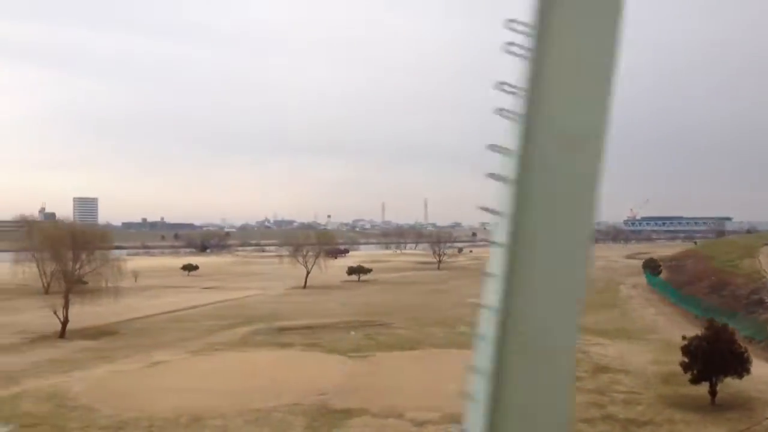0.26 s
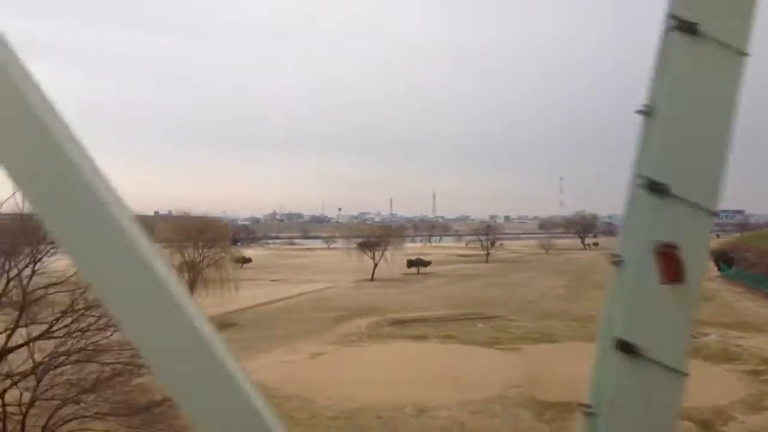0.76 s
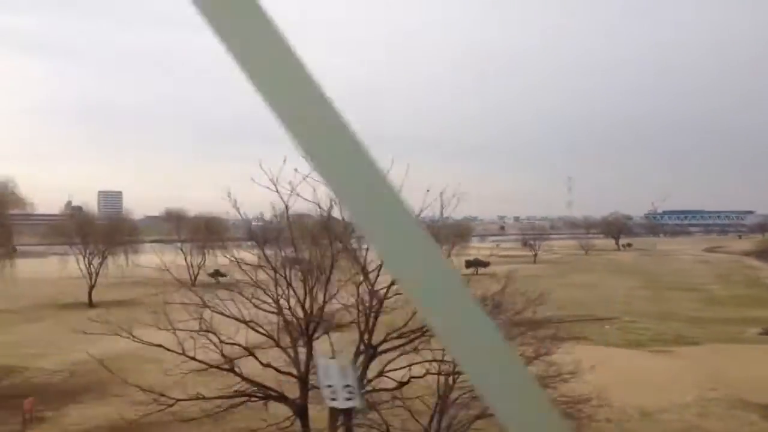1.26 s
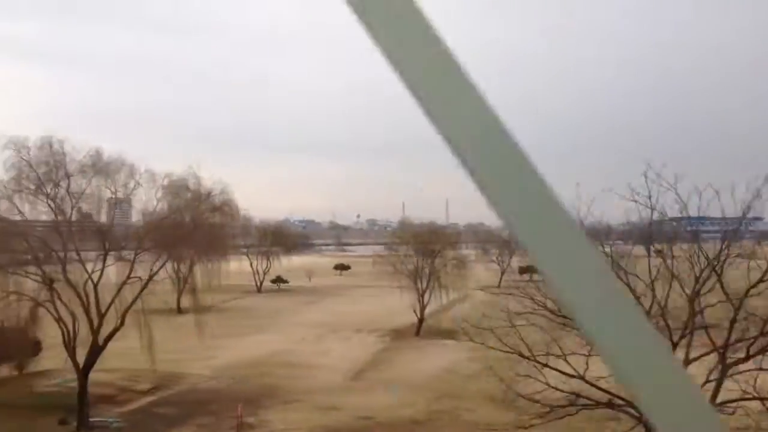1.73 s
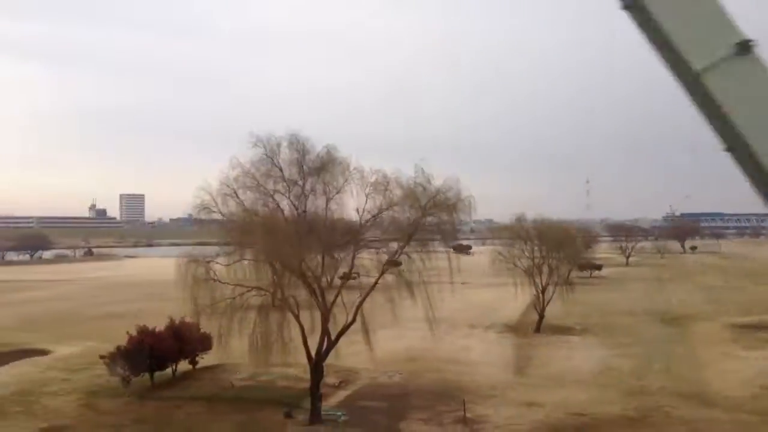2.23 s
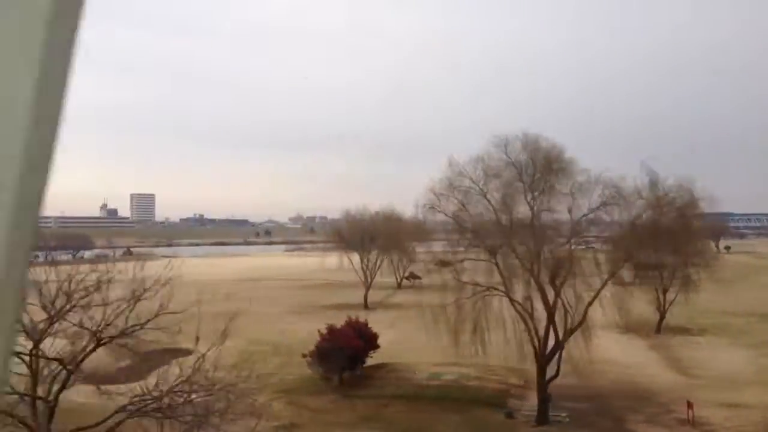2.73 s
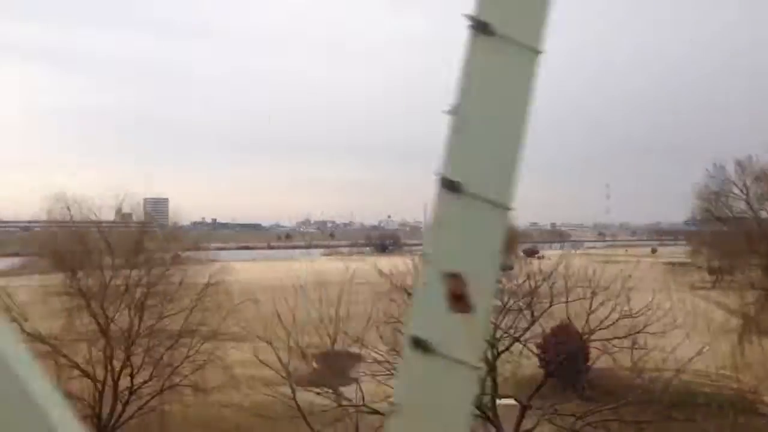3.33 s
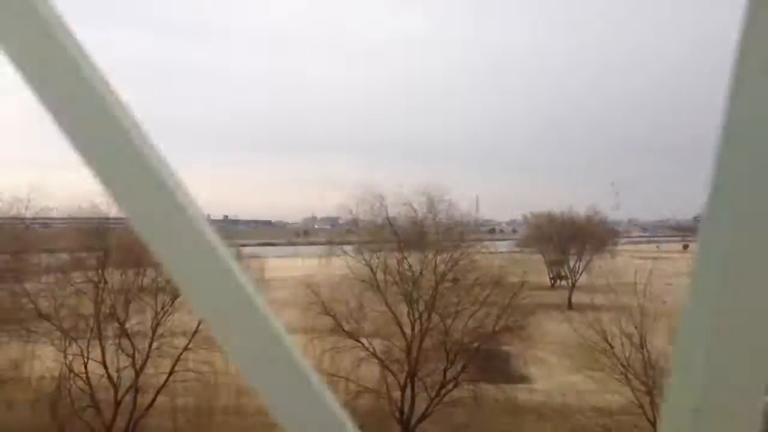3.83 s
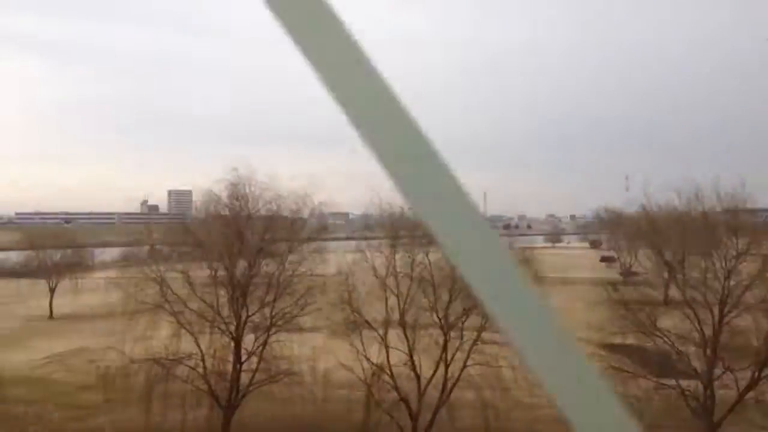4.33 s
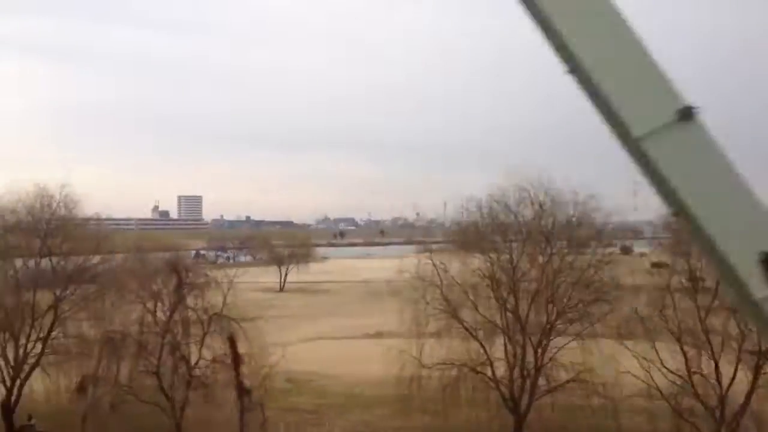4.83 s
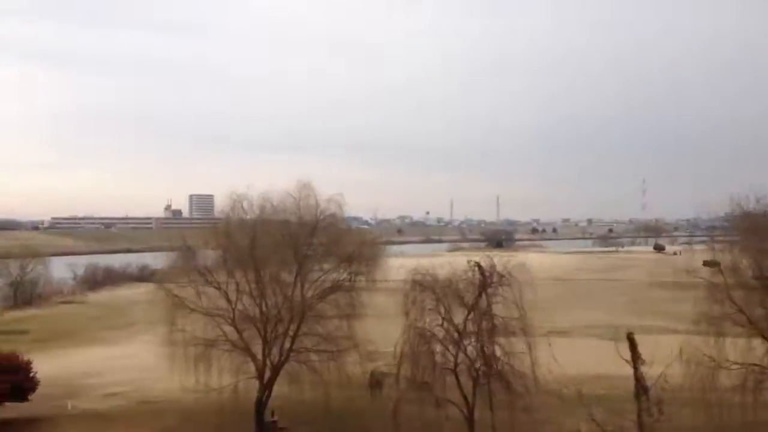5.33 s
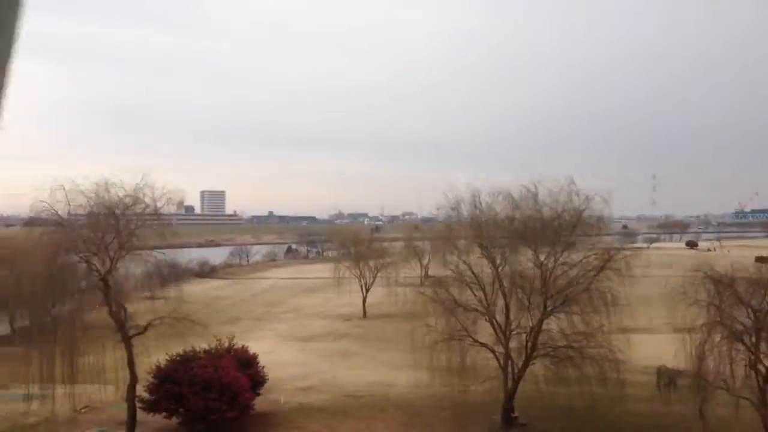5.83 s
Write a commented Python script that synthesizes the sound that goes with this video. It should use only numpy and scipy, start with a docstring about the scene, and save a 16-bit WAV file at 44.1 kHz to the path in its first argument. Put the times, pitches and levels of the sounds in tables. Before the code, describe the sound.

Inside a moving train carriage, a steady low rumble and rushing roar, with booming, clashing wheel beats over rail joints about once a second.

```python
"""Train carriage on a steel bridge

Inside the carriage as it crosses a steel truss bridge. Filtered noise makes the steady roar and hiss of the wheels,
and random forces on a bank of resonances make the car body rumble. About once a second four axles, two to a bogie,
run over a rail joint: each adds a swell of body boom and of clashing, sizzling noise. Small jolts knock the floor
now and then, during the joint hits as well as between them. A thin gear whine wavers over it all, wheels sing
faintly and fittings squeak."""
import sys
import numpy as np
from scipy import signal
from scipy.fft import rfft, irfft, next_fast_len
from scipy.io import wavfile
from scipy.ndimage import uniform_filter1d, minimum_filter1d

SR = 44100
rng = np.random.default_rng(int(sys.argv[2]) if len(sys.argv) > 2 else 0)


def persist_wave(psi):
    """Save psi, clipped to +-1, as 16-bit WAV."""
    counts = np.round(np.clip(psi, -1, 1) * 32767).astype(np.int16)
    wavfile.write(sys.argv[1], SR, np.atleast_2d(counts).T)


N = 268559
TIME = np.arange(N) / SR   # seconds
SPEED_M_PER_S, RAIL_M = 24.2, 25


def from_db(db):
    """Decibels to amplitude."""
    return 10 ** (np.asarray(db) / 20)


def rms_one(x):
    """Scale a signal to rms 1."""
    return x / np.sqrt(np.mean(x ** 2) + 1e-20)


def in_time(rows):
    """Rows that begin with a time in seconds become curves, one value per sample for each further column."""
    seconds, *columns = np.transpose(rows)
    return [np.interp(TIME, seconds, column) for column in columns]


def drift(rate_hz):
    """A random wander of spread 1: noise through two equal low-pass poles, run at a fortieth of the sample rate."""
    step, settle = 40, 2000   # samples per slow sample, slow samples thrown away
    pole = np.exp(-2 * np.pi * rate_hz * step / SR)
    grain = rng.standard_normal(N // step + settle + 2)
    slow = signal.lfilter([1], [1, -2 * pole, pole ** 2], grain)[settle:]
    return np.interp(np.arange(N) / step, np.arange(len(slow)), rms_one(slow))


def noise(spectrum):
    """Steady noise with the given spectrum, falling away steadily beyond its ends; rms 1."""
    hz, db = np.transpose(spectrum)
    size = next_fast_len(N)
    bins_hz = np.maximum(np.arange(size // 2 + 1) * SR / size, 1)
    low_skirt = np.minimum(bins_hz / hz[0], 1) ** 2
    high_skirt = np.minimum(hz[-1] / bins_hz, 1) ** 4
    gain = low_skirt * high_skirt * from_db(np.interp(np.log(bins_hz), np.log(hz), db))
    return rms_one(irfft(rfft(rng.standard_normal(size)) * gain, size)[:N])


def resonate(x, hz, width_hz):
    """One resonance with gain 1 at its top: a pole pair, with zeros at both ends of the spectrum."""
    pole = np.exp(-np.pi * width_hz / SR)
    feed = np.array([1, 0, -1]) * (1 - pole ** 2) / 2
    feedback = [1, -2 * pole * np.cos(2 * np.pi * hz / SR), pole ** 2]
    return signal.lfilter(feed, feedback, x + 1e-18)   # the tiny offset keeps silence from slowing the filter


# Modes of the floor and walls.
# Each row: frequency in Hz, width in Hz, relative gain in dB when rolling, relative gain in dB when struck at a joint.
BODY_MODES = [(131.1, 18.7, -1, -1.1), (170, 20.7, 1.5, -2), (215.7, 16, -2, -13.5),
              (264.4, 21.7, -0.4, -3.5), (294, 40.4, -2, -1), (361.5, 27, -5.5, -6), (401, 53, -12, -14),
              (452.2, 8.3, -15, -6), (494, 8.2, -15, -8.5)]


def body(forces, modes_db):
    """Each mode of the car body rings with its own force; suspension and lining shut out what lies below and above."""
    modes = 0
    for force, db, (hz, width_hz, *_) in zip(forces, modes_db, BODY_MODES):
        modes = modes + from_db(db) * resonate(force, hz, width_hz)
    return signal.sosfilt(signal.butter(3, [115, 480], "band", fs=SR, output="sos"), modes)


def shaking(modes_db, evenness, span_s):
    """The body under steady random forces, its slower surges partly evened out; rms 1."""
    forces = rng.standard_normal((len(BODY_MODES), N + SR))
    x = body(forces, modes_db)[SR:]   # the first second lets the modes build up
    power = uniform_filter1d(x * x, int(span_s * SR))
    power = uniform_filter1d(power, int(span_s * SR / 2))
    return rms_one(x / power ** (evenness / 2))


# Spectra of the deep sway under the body modes, the rail roar and the rolling hiss.
# Each row: frequency in Hz, relative level in dB per Hz.
SWAY_SPECTRUM = [(25, -19), (40, -22), (55, -10.5), (82, 1), (110, 3.5), (160, -16)]
ROAR_SPECTRUM = [(450, -6), (600, 0.7), (800, 0.5), (1020, -0.5), (1200, -4.5), (1450, -7.5), (2100, -8),
                 (2700, -8), (3000, -12.5), (3400, -24), (4500, -42)]
HISS_SPECTRUM = [(2500, -19), (3400, 0.5), (4000, -2.0), (4550, -1.5), (5050, -7.5), (5900, -3),
                 (6900, -5.5), (8200, -11.5), (9600, -22.5), (12000, -25), (15000, -28.5)]


def rolling():
    """Rough wheels on rough rails: the body's rumble, and airborne roar and hiss that flutter with the contact."""
    rumble_db, roar_db, hiss_db = -18, -29.0, -46   # before the roughness of each rail
    # each rail's roughness is reached when the middle of the axle group is at the middle of the rail
    to_mid_rail_s = (RAIL_M + AXLES[-1][0]) / 2 / SPEED_M_PER_S
    rail_db, = in_time([(s + to_mid_rail_s, db) for s, *_, db in JOINTS])
    contact = drift(26)
    shake = shaking(np.array(BODY_MODES)[:, 2], evenness=0.15, span_s=0.042)
    rumble = from_db(rumble_db + rail_db) * (shake + from_db(-22.0) * noise(SWAY_SPECTRUM))
    roar = from_db(roar_db + rail_db + 0.3 * contact) * noise(ROAR_SPECTRUM)
    hiss = from_db(hiss_db + rail_db + 0.4 * contact) * noise(HISS_SPECTRUM)
    return rumble, roar + hiss


# Rail joints.
# Each row: arrival of the first axle in seconds, boom in dB, clash in dB, sizzle in dB,
# extra for the leading bogie in dB, roughness of the next rail in dB.
JOINTS = [(-0.468, -4.5, -22, -29.5, 0, .5), (0.585, -8.5, -18, -30.5, -2, 0.7),
          (1.641, -8.5, -21.7, -34.5, 1.3, -0.3), (2.691, -8, -19.5, -31, 0, -0.65),
          (3.742, -11, -19, -30.5, 1.9, -1), (4.802, -10, -19.5, -31, -1.5, 0.9),
          (5.856, -8, -20.5, -30.5, 1.5, 1.5)]
# Two bogies of two axles, the second bogie nearer.
# Each row: distance behind the first axle in m, build-up in seconds, then boom, clash and sizzle in dB,
# each added to the level of the joint.
AXLES = [(0, 0.044, -5.5, -4.5, -6.5), (2.1, 0.036, -2, -2.5, -3.5), (5.95, 0.039, -0.5, 0, -1.5),
         (8.25, 0.032, -4, -1.7, -4)]


def swell(joints_db, axles_db, t60_s):
    """Each axle nears each joint, strikes it and builds the vibration up, then it dies away; their powers add."""
    # rail ends are worn, so the noise already grows as a wheel nears: level on arrival (re its peak), growth time
    approach, approach_s = from_db(-12), 0.093
    power = np.zeros(N)
    for (arrival_s, *_, lead_db, _), joint_db in zip(JOINTS, joints_db):
        for (behind_m, rise_s, *_), axle_db, bogie_db in zip(AXLES, axles_db, [lead_db, lead_db, 0, 0]):
            age = TIME - arrival_s - behind_m / SPEED_M_PER_S
            nearing = approach * np.exp(np.minimum(age, 0) / approach_s)
            onset = np.maximum(nearing, np.clip(age / rise_s, 0, 1))
            decay_db = 60 * np.maximum(age - rise_s, 0) / t60_s
            power += (onset * from_db(joint_db + bogie_db + axle_db - decay_db)) ** 2
    return np.sqrt(power)


# Spectra of the clash and the sizzle at the joints.
# Each row: frequency in Hz, relative level in dB per Hz.
CLASH_SPECTRUM = [(450, -0.5), (600, -1), (800, -2.5), (1020, -5.5), (1200, -8.5), (1450, -9.5), (2100, -8),
                  (2700, -8.5), (3000, -13.5), (3400, -21), (4500, -47)]
SIZZLE_SPECTRUM = [(2500, -8), (3400, -0.5), (4000, -3), (4550, 0), (5050, -8.5), (5900, -4.5), (6900, -5),
                   (8200, -10.5), (9600, -22.0), (12000, -25.5), (15000, -32)]


def joints():
    """Each axle booms through the body while rails and girders clash with a rattling grain."""
    _, boom_db, clash_db, sizzle_db, *_ = np.transpose(JOINTS)
    _, _, axle_boom_db, axle_clash_db, axle_sizzle_db = np.transpose(AXLES)
    rattle = drift(70)
    shake = shaking(np.array(BODY_MODES)[:, 3], evenness=0.78, span_s=0.02)
    boom = swell(boom_db, axle_boom_db, t60_s=0.81) * (shake + from_db(-33) * noise(SWAY_SPECTRUM))
    clash = swell(clash_db, axle_clash_db, t60_s=0.57) * from_db(1.1 * rattle) * noise(CLASH_SPECTRUM)
    sizzle = swell(sizzle_db, axle_sizzle_db, t60_s=0.67) * from_db(0.21 * rattle) * noise(SIZZLE_SPECTRUM)
    return boom, clash + sizzle


# Level of the whine before its waver.
# Each row: time in seconds, level in dB rms.
WHINE_LEVEL = [(0, -45.5), (1.35, -46), (1.7, -57), (4.05, -57), (4.26, -39.5), (4.65, -48), (5.0, -41),
               (5.6, -41.5), (6.09, -38)]


def whine(waver_hz, waver_db):
    """The meshing gears give one thin tone that sinks steadily, wavering in pitch and level."""
    start_hz, sag_hz_per_s = 2740, 7.6
    db, = in_time(WHINE_LEVEL)
    hz = start_hz - sag_hz_per_s * TIME + waver_hz * drift(4.8)
    phase = 2 * np.pi * np.cumsum(hz) / SR
    return from_db(db + waver_db * drift(6)) * np.sqrt(2) * np.sin(phase)   # root 2 brings the sine to rms 1


def singing(hz, width_hz):
    """A narrow resonance kept going by friction, as noise through the same resonance twice; rms 1."""
    once = resonate(rng.standard_normal(N + SR), hz, width_hz)
    return rms_one(resonate(once, hz, width_hz)[SR:])


# Wheel resonances that sing faintly.
# Each row: frequency in Hz, width in Hz, level in dB rms.
WHEEL_MODES = [(998, 25, -43.5), (4693, 40, -72), (5500, 20, -70)]


def wheels():
    """The rolling wheels ring on in a few modes."""
    return sum(from_db(db) * singing(hz, width_hz) for hz, width_hz, db in WHEEL_MODES)


# Faint squeaks of the carriage fittings.
# Each row: middle in seconds, time from there to a fade to 1/e in seconds, frequency in Hz, level at the top in dB rms.
SQUEAKS = [(0.023, 0.018, 11000, -62), (.57, .025, 8500, -56), (.735, .025, 11100, -63),
           (1.78, .03, 11000, -63), (5.12, .02, 11020, -60)]


def squeaks(width_hz):
    """Brief rubs that swell and fade in one resonance."""
    total = np.zeros(N)
    for middle_s, length_s, hz, db in SQUEAKS:
        rub = np.exp(-((TIME - middle_s) / length_s) ** 2)
        total += from_db(db) * rub * singing(hz, width_hz)
    return total


def bumps():
    """Mostly faint jolts at random moments, as rows of start in seconds and push in dB."""
    bumps_per_s, mean_db, spread_db = 1.5, -11, 2
    born = rng.random(N) < bumps_per_s / SR
    pushes_db = mean_db + spread_db * rng.standard_normal(N)
    return list(zip(TIME[born], pushes_db[born]))


# Jolts at set moments, strong and weak.
# Each row: start in seconds, push in dB relative to the common jolt level.
SET_JOLTS = [(0.349, -4.5), (0.634, 3), (0.899, -13), (1.001, -17), (2.28, -3), (2.956, -3), (3.735, -4),
             (3.997, -1.5), (4.915, -7), (5.084, -2), (5.563, -3), (5.662, -7)]


def jolts(level_db, bounce_db):
    """A sharp push and a weaker rebound knock on the body; neighbouring modes swing in opposite directions."""
    force, chance = np.zeros(N + SR), rng.random((N, 2))
    for (s, db), (delay, side) in zip(list(SET_JOLTS) + bumps(), chance):
        rebound_s = s + .008 + .012 * delay
        force[int(s * SR)] += from_db(db)
        force[int(rebound_s * SR)] += from_db(db + bounce_db) * np.sign(side - .5)   # either direction
    swing = (-1) ** np.arange(len(BODY_MODES))[:, None]
    modes_db = np.array(BODY_MODES)[:, 2]
    # a single push of 0 dB peaks at level_db
    unit_peak = np.abs(body(swing * signal.unit_impulse(SR), modes_db)).max()
    return from_db(level_db) * body(swing * force[:N], modes_db) / unit_peak


def cabin(x, count):
    """Early reflections off walls, windows and seats colour the sound with a slight, fixed ripple."""
    out, strength = x.copy(), from_db(-26.5)
    delays_s = rng.uniform(0.002045, .02, count)
    for delay_s, side in zip(delays_s, rng.choice([-1, 1], count)):
        lag = int(delay_s * SR)
        out[lag:] += side * strength * x[:-lag]
    return out / np.sqrt(1 + count * strength ** 2)


def scene():
    """Lows come through the floor, the rest through the air of the cabin."""
    rumble, rush = rolling()
    boom, clatter = joints()
    floor = rumble + boom + jolts(level_db=-3.5, bounce_db=-8.0)
    tones = whine(waver_hz=1.79, waver_db=2.4) + wheels() + squeaks(width_hz=300)
    air = cabin(rush + clatter, count=12) + tones
    return (floor + air)[None]


def record(dry):
    """A fast limiter turns peaks above full scale down, then a steep low-pass cuts the top."""
    cutoff_hz = 15100
    allowed = 1 / np.maximum(np.abs(dry), 1)
    gain = uniform_filter1d(minimum_filter1d(allowed, size=256), size=256)
    return signal.sosfilt(signal.ellip(10, .1, 80, cutoff_hz, fs=SR, output="sos"), dry * gain)


dry = scene()
out = record(dry)
persist_wave(out)
```